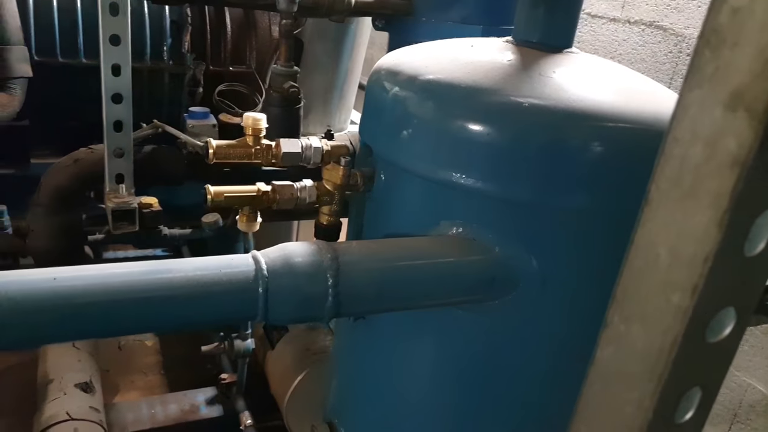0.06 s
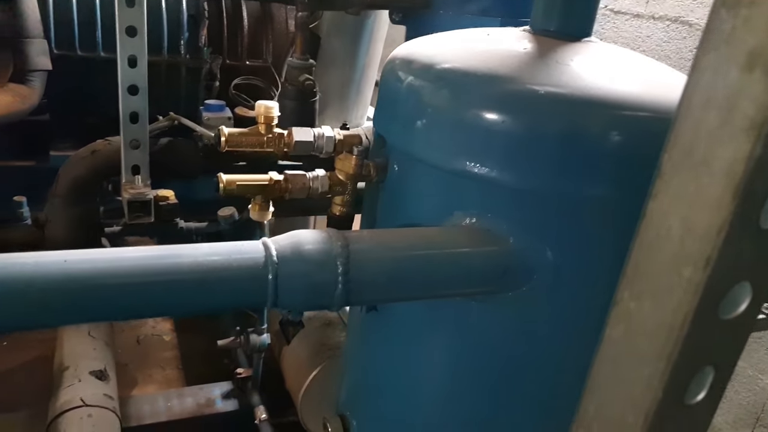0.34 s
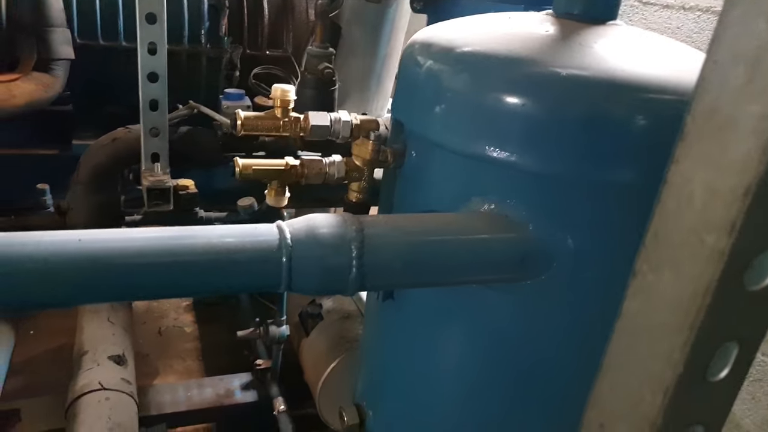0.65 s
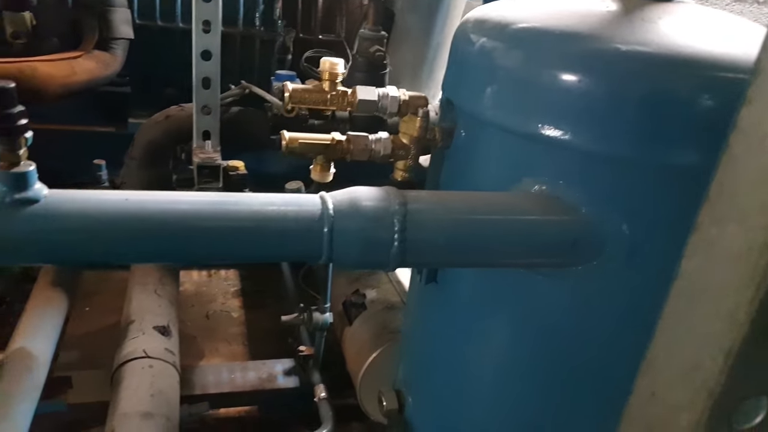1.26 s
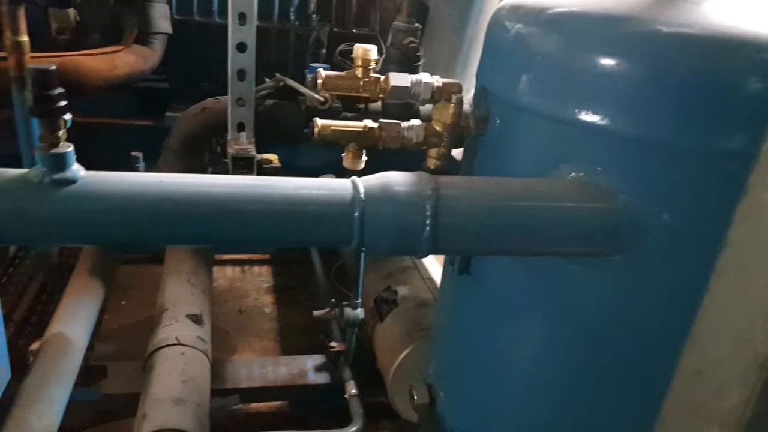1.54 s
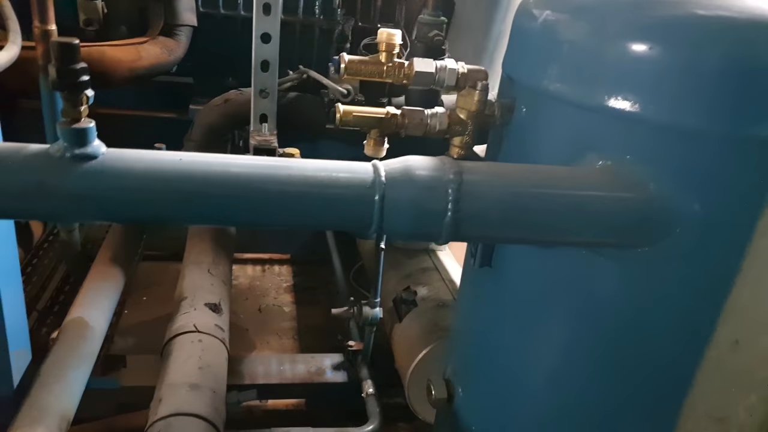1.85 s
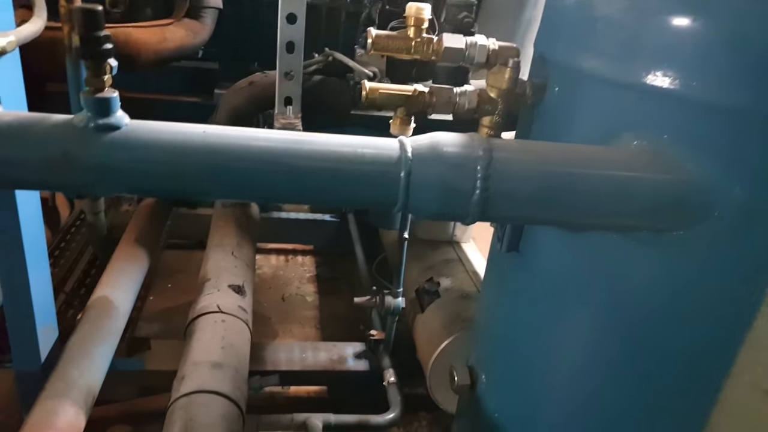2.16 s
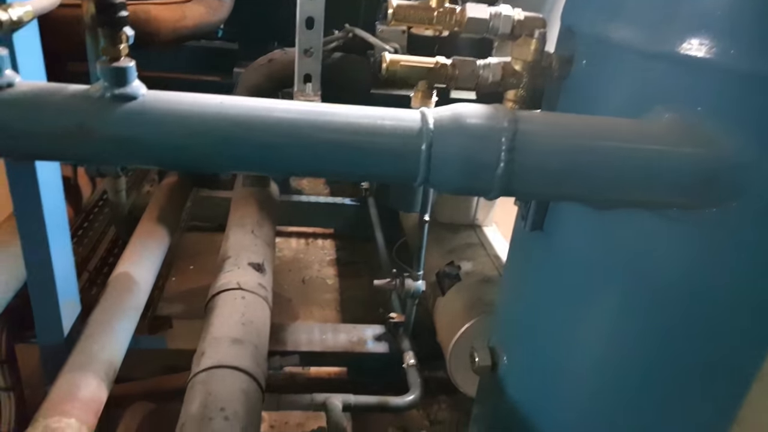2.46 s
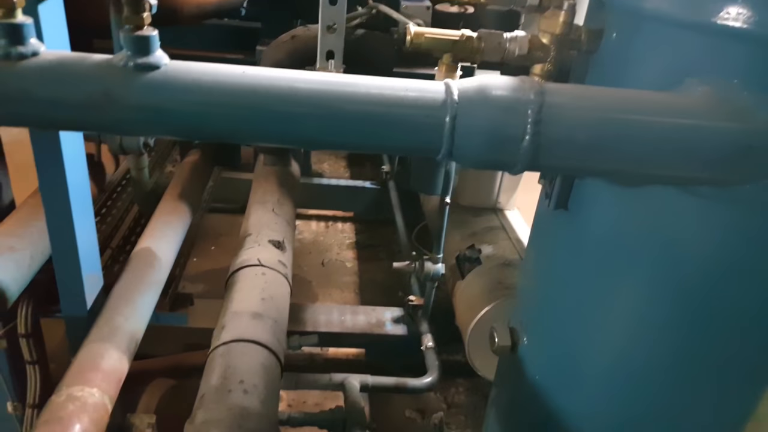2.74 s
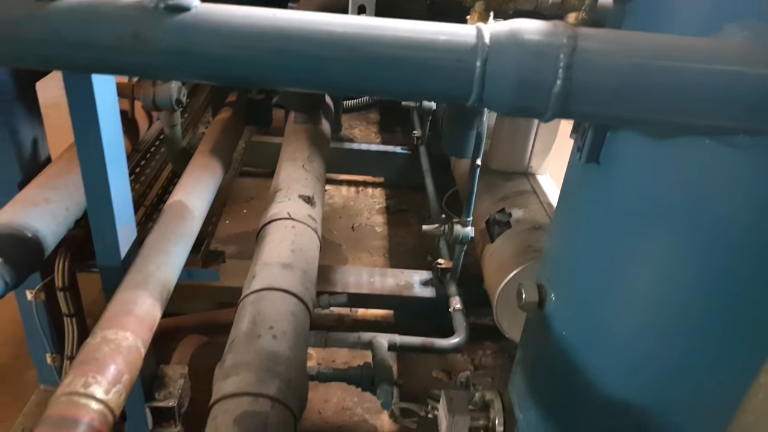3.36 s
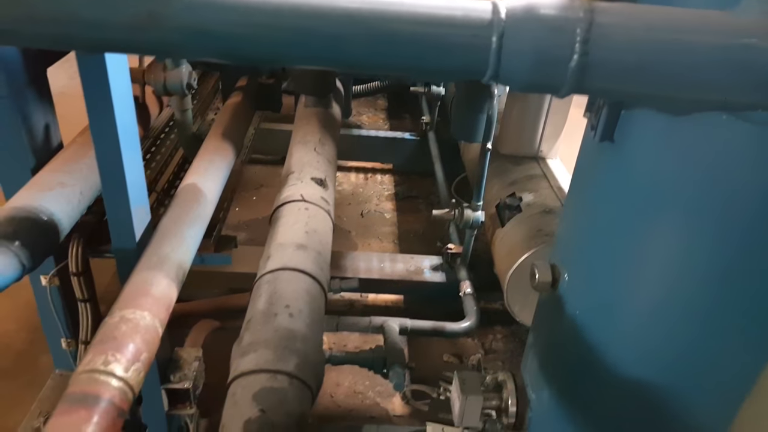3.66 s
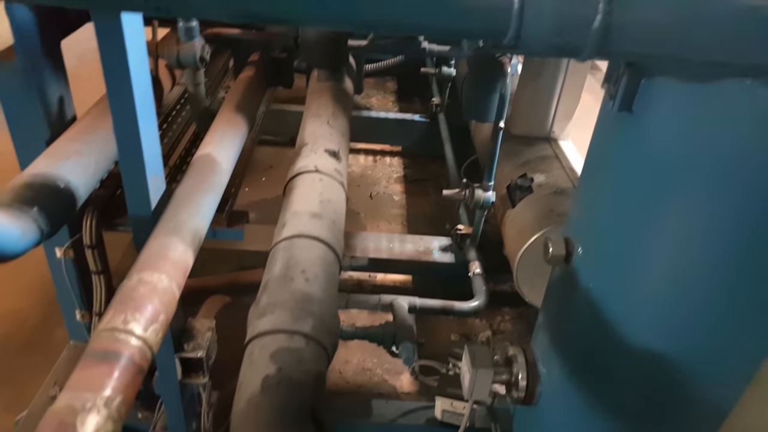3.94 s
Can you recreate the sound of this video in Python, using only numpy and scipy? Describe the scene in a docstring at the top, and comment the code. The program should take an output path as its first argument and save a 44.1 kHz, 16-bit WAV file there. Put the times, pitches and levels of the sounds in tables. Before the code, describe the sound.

A large refrigeration compressor hums strongly and steadily for all 4 seconds, over rushing, hissing gas and the drone of other motors. Higher whines and faint whistles swell and fade at fixed pitches as the microphone moves slowly through the plant room. Between about 3.1 and 3.7 seconds, gas in the pipes adds two faint, short hisses and two brief ringing tones while the hum carries on.

```python
"""A refrigeration plant room, heard while walking slowly past the pipes of a running screw compressor.
Five rotor lobes release gas in periodic pulses, giving a strong hum and a harmonic series above it.
Meshing gears whine, the shaft adds weak harmonics, faint whistles come and go, and other motors drone.
Turbulent gas rushes, hisses and briefly excites pipe resonances. The room's standing waves vary the
strength and phase of the tones along the walk."""
import sys
import numpy as np
from scipy import signal
from scipy.fft import rfft, irfft
from scipy.io import wavfile
from scipy.ndimage import uniform_filter1d, minimum_filter1d

SR = 44100
rng = np.random.default_rng(int(sys.argv[2]) if len(sys.argv) > 2 else 0)


def int16_out(signal):
    """Quantize to a 16-bit WAV file."""
    q = np.round(np.clip(np.atleast_2d(signal).T, -1, 1) * 32767)
    wavfile.write(sys.argv[1], SR, q.astype(np.int16))


N = 176400

SHAFT_HZ, SPEED_UP_HZ_PER_S = 48.785, .015
LOBES, GEAR_TEETH = 5, 28
ROUGH_HZ = 14  # rate of the tones' quick unsteadiness

# In all tables, pan_db is left minus right level and lead_rad is the phase lead of the left side.
# Strong tones of the gas pulses: lobe_harmonic, level_db, pan_db, lead_rad
PULSE_TONES = [(1, -10.0, 0.65, 0.23), (2, -17.4, 4, -0.22)]
# Change of the hum along the walk: time_s, gain_db, added_pan_db
HUM_ALONG_WALK = [(0, 0, 0), (1.35, .55, -0.6), (2.5, -0.2, -0.1), (4, 0, -0.5)]
# Gear mesh and strong lobe overtones: shaft_harmonic, pan_db, lead_rad, [(time_s, level_db)]
WHINE_TONES = [ (15, 3.5, .65, [(0, -27.5), (.4, -30), (1.2, -36), (2.2, -42), (3.1, -36.5), (4, -33.5)]),
               (20, 3.2, -2.31, [(0, -29.5), (1, -29.5), (2, -29), (2.5, -24.5), (3.1, -26.5), (3.7, -25),
               (4, -28.5)]), (GEAR_TEETH, 2.4, .2, [(0, -32), (.6, -28.5), (1.3, -28), (2.7, -29.5),
               (3.4, -31), (4, -33.5)]), (35, 0, -2.03, [(0, -33), (.4, -34), (.7, -48), (1.3, -38.5),
               (2.1, -43), (2.8, -53), (3.4, -49), (4, -43)]), (45, 4.5, -.3, [(0, -42.5), (.5, -44),
               (1.2, -49), (2, -47.5), (2.4, -42.5), (3, -43.5), (3.4, -50), (4, -52)]),
               (50, -.8, -0.62, [(0, -51), (.7, -52), (1.25, -41), (2, -52.5), (2.8, -47), (3.4, -43.5),
               (3.9, -39)])]
# High whistles of the compressor: pitch_hz, pan_db, lead_rad, [(time_s, level_db)]
WHISTLE_TONES = [(4635, 2, .3, [(0, -56), (1.1, -46.5), (2.3, -60), (3.6, -48), (4, -56)]),
                 (5466, -.7, .2, [(0, -63), (1.5, -58), (2.55, -48.5), (3.1, -56), (4, -54)]),
                 (8470, 0, 0, [(0, -64), (.6, -51), (1.5, -57), (1.95, -52), (2.5, -63), (4, -62)])]
# Weak rotor tones: shaft_harmonic (rounded for pitch), level_db, pan_db, lead_rad
SHAFT_TONES = [(1, -58, 2, -.2), (3, -45, 3, 0), (4, -39, -1, 0.5), (6, -44, 1.8, -0.5), (9, -47, 8, 1.8),
               (11, -42.5, 20, 1.4), (12, -44.5, -20, 2.5), (13, -43.5, 2, 2.5), (15.9, -43, 1, 1.7),
               (21, -40.5, 1, 2), (25, -39.5, -4.5, -2), (27, -39, 2, 3.5), (29.6, -40, -3, 1.5),
               (40, -46.5, 0.5, -2), (55, -48, -1, -2.5)]
# Steady motors and pumps: pitch_hz, level_db, pan_db, lead_rad
MOTOR_TONES = [(90.7, -48, 2.5, 0), (100, -48, .4, 0), (161.7, -42.5, -2.5, 0), (343.4, -49, -2, 0.2),
               (424.8, -38.5, 5.5, 0.5), (449, -44, -4, -3.3), (503, -44.5, -3, 0.5), (531, -40.5, -3, 1.5),
               (553, -54, -1, -3.5), (930, -47, 0, 1.4), (1047, -50.5, -8, 1.5), (1261, -46, 10, 3),
               (1829, -53, -3, -3)]
# Machine tones that swell and fade: pitch_hz, pan_db, lead_rad, [(time_s, level_db)]
SWELLING_TONES = [(56.9, 1.3, 0, [(0, -57), (.7, -43), (1.3, -35.5), (1.9, -44), (2.3, -50), (2.9, -39),
                  (3.5, -38), (4, -41)]), (114, 1.4, 0.044, [(0, -43), (1.5, -38), (2.3, -44), (3.2, -45),
                  (3.9, -35)]), (1671, 2.9, -1.7, [(0, -39), (.6, -44), (1.4, -53), (2.2, -45), (3.4, -36),
                  (4, -36.5)])]
# Base spectrum of the gas flow, before its gains: frequency_hz, mid_db_per_hz, side_db_per_hz
FLOW_SPECTRUM = [(20, -67, -85), (35, -74, -93), (65.4, -64, -79), (108, -52, -71), (176, -59, -80),
                 (223, -53, -68), (245, -46.5, -56), (276, -54, -71), (327, -67, -77), (406, -59.5, -70),
                 (500, -55.5, -65), (690, -62.5, -74), (990, -61, -65.5), (1135, -66, -61),
                 (1670, -69.5, -67), (2230, -68.5, -71.5), (2670, -72, -71), (3650, -70.5, -70.5),
                 (4280, -73.5, -73), (6060, -78.5, -78), (9500, -82, -82), (12000, -83, -82.5),
                 (15500, -91, -92)]
# Gains of the flow noise along the walk: time_s, bass_db, middle_db, treble_db
FLOW_ALONG_WALK = [(0, -2.5, -2, -0.6), (1.5, 0.5, -0.5, -0.5), (2.6, -0.7, 0.6, 0), (4, 1.3, 1, 1)]
# Brief pipe resonances: centre_s, sigma_s, pitch_hz, bandwidth_hz, level_db
PIPE_RESONANCES = [(.19, .03, 3000, 300, -40), (3.10, 0.018, 3150, 300, -37.5), (3.39, .02, 977, 30, -28.5),
                   (3.505, .02, 3280, 400, -36.5), (3.653, 0.048, 976, 20, -27.5)]


def undb(db):
    """Amplitude ratio: a factor of ten for every 20 dB."""
    return 10 ** (np.asarray(db) / 20)


def drift(rate_hz):
    """Band-limited noise of unit spread, changing about rate_hz times a second."""
    count = int(rate_hz * N / SR) + 8
    fine = signal.resample(rng.standard_normal(count), count * 16)
    return np.interp(np.arange(N) / SR * rate_hz * 16, np.arange(len(fine)), fine)


def random_phasor(rate_hz):
    """Random amplitude and phase modulation of unit power."""
    return (drift(rate_hz) + 1j * drift(rate_hz)) / np.sqrt(2)


def tone(cycles, level_db, pan_db, lead_rad, modulation=1):
    """A sinusoid reaches two microphones with a difference in level and phase."""
    side = np.array([[.5], [-.5]])
    stereo = undb(side * pan_db) * np.exp(1j * side * lead_rad)
    return np.sqrt(2) * undb(level_db) * np.real(stereo * modulation * np.exp(2j * np.pi * cycles))


def passing_tone(cycles, pan_db, lead_rad, path, roughness=.14, rough_hz=ROUGH_HZ):
    """Modulation: a tone swells and fades along the walk and is roughened at random."""
    level_db = np.interp(np.arange(N) / SR, *np.transpose(path))
    cycles = cycles + rng.random()
    modulation = (1 + roughness * random_phasor(rough_hz)) / np.hypot(1, roughness)
    return tone(cycles, level_db, pan_db, lead_rad, modulation)


def standing_waves(hz, depth=.43, rate_hz=1.1, roughness=.22):
    """Interference varies a tone along the walk; shorter waves differ more between the sides."""
    apart = min(hz / 1500, 1)
    each_side = np.array([random_phasor(rate_hz), random_phasor(rate_hz)])
    slow = np.sqrt(1 - apart ** 2) * random_phasor(rate_hz) + apart * each_side
    modulation = 1 + depth * slow + roughness * random_phasor(ROUGH_HZ)
    return modulation / np.sqrt(1 + depth ** 2 + roughness ** 2)


def lobe_hum(shaft, t, swell_db=.12, flutter_db=.22):
    """Periodic gas pulses radiate two phase-locked harmonics of the lobe-passing frequency."""
    times, path_db, path_pan = np.transpose(HUM_ALONG_WALK)
    gain_db = np.interp(t, times, path_db) + swell_db * drift(rate_hz=4.97)
    added_pan = np.interp(t, times, path_pan)
    return sum(tone(k * LOBES * shaft, db + gain_db + flutter_db * drift(ROUGH_HZ), pan + added_pan, lead)
               for k, db, pan, lead in PULSE_TONES)


def whines(shaft):
    """Gear teeth and lobes repeat with each turn, so they sound at harmonics of the shaft rate."""
    return sum(passing_tone(round(k) * shaft, *rest) for k, *rest in WHINE_TONES)


def whistles(t):
    """Deep random modulation spreads each faint, high tone into a narrow band."""
    return sum(passing_tone(hz * t, *rest, roughness=1, rough_hz=60.2) for hz, *rest in WHISTLE_TONES)


def rotor_tones(shaft):
    """Periodic rotation adds weak harmonics of the shaft rate."""
    return sum(tone(round(k) * shaft + rng.random(), db, pan, lead, standing_waves(k * SHAFT_HZ))
               for k, db, pan, lead in SHAFT_TONES)


def lobe_buzz(shaft, first_db=-50.5, db_per_octave=-8.5, scatter_db=.5):
    """The upper harmonic series of the gas pulses weakens with frequency and forms a thin buzz."""
    out = 0
    for k in range(12, 40):
        db = first_db + db_per_octave * np.log2(k / 12) - scatter_db * rng.standard_normal()
        cycles = k * LOBES * shaft + rng.random()
        lead = rng.uniform(-np.pi, np.pi)
        out = out + tone(cycles, db, 0, lead, standing_waves(k * LOBES * SHAFT_HZ))
    return out


def other_machines(t):
    """Motors and pumps are independent sources, each radiating at its own frequency."""
    drone = sum(tone(hz * t + rng.random(), db, pan, lead, standing_waves(hz))
                for hz, db, pan, lead in MOTOR_TONES)
    return drone + sum(passing_tone(hz * t, *rest) for hz, *rest in SWELLING_TONES)


def gas_flow(shaft, t, flicker_db=1.74, throb_depth=.046, swell_db=.37, trim_db=-.16, pan_db=.8):
    """Turbulence makes broadband noise: bands flicker independently, and the lobes modulate the hiss."""
    f = np.maximum(np.arange(N // 2 + 1) * SR / N, 1)
    hz, *densities_db = np.transpose(FLOW_SPECTRUM)
    shapes = (undb(np.interp(np.log(f), np.log(hz), db)) for db in densities_db)
    mid, side = (rfft(rng.standard_normal(N)) * shape * np.sqrt(SR / 2) for shape in shapes)
    spectrum = np.array([mid + side, mid - side])
    times, *gains_db = np.transpose(FLOW_ALONG_WALK)
    bass, middle, treble = (undb(np.interp(t, times, db)) for db in gains_db)
    throb = 1 + throb_depth * np.cos(2 * np.pi * LOBES * shaft)
    hiss = treble * throb * undb(swell_db * drift(rate_hz=25))
    edges_hz = np.r_[0, 160, 340, 520, np.geomspace(720, 3000, 12), 3300:9000:300, 9000:17000:600]
    out = 0
    for lo, hi in zip(edges_hz, edges_hz[1:]):
        band = irfft(spectrum * ((f >= lo) & (f < hi)), N)
        flicker = undb(flicker_db * drift(rate_hz=20))
        gain = hiss if lo > 2000 else middle if lo > 700 else bass if hi < 170 else 1
        out = out + band * flicker * gain
    return out * undb(trim_db + pan_db * np.array([[.5], [-.5]]))


def pipe_flares(t, stereo_spread=.46):
    """Resonance: surges of gas briefly excite narrow frequency bands of the pipework."""
    out = 0
    for centre_s, sigma_s, hz, bandwidth_hz, db in PIPE_RESONANCES:
        each_side = np.array([random_phasor(bandwidth_hz), random_phasor(bandwidth_hz)])
        grain = (random_phasor(bandwidth_hz) + stereo_spread * each_side) / np.hypot(1, stereo_spread)
        envelope = np.exp(-((t - centre_s) / sigma_s) ** 2 / 2)
        out = out + tone(hz * t, db, 0, 0, grain) * envelope
    return out


def scene():
    """Superposition: all sources add, while the shaft and its harmonics creep up in frequency."""
    t = np.arange(N) / SR
    shaft = np.cumsum(SHAFT_HZ + SPEED_UP_HZ_PER_S * (t - t.mean())) / SR  # angle in turns
    compressor = lobe_hum(shaft, t) + whines(shaft) + whistles(t) + rotor_tones(shaft) + lobe_buzz(shaft)
    return compressor + other_machines(t) + gas_flow(shaft, t) + pipe_flares(t)


def record(dry, ceiling=.96, window_s=.012, cutoff_hz=15500):
    """Peak limiting holds the highest crests down, and a low-pass filter cuts the top of the treble."""
    span = int(window_s * SR)
    gain = np.minimum(1, ceiling / np.abs(dry).max(axis=0))
    limited = dry * uniform_filter1d(minimum_filter1d(gain, span), span)
    lowpass = signal.ellip(8, .05, 60, cutoff_hz, fs=SR, output="sos")
    return signal.sosfiltfilt(lowpass, limited)


dry = scene()
out = record(dry)
int16_out(out)
```